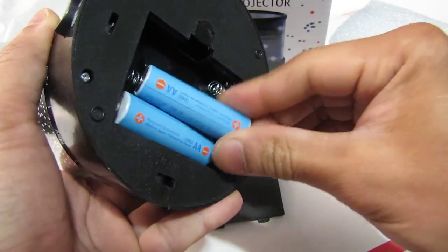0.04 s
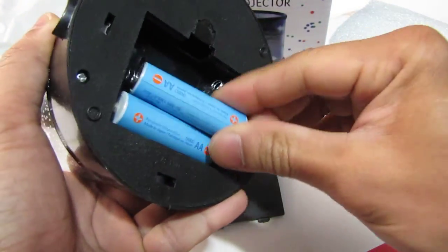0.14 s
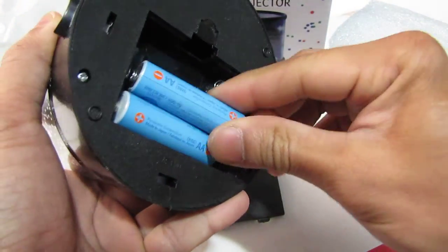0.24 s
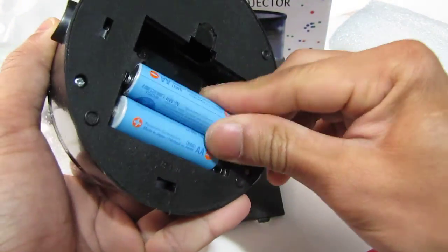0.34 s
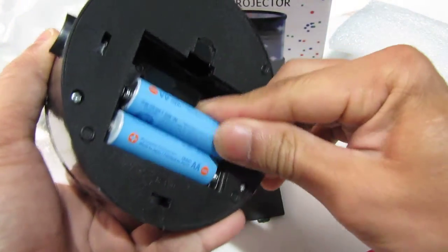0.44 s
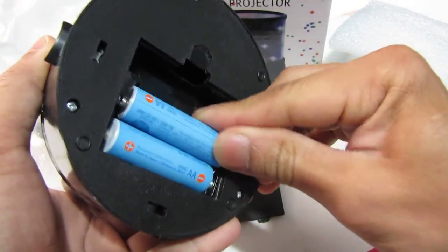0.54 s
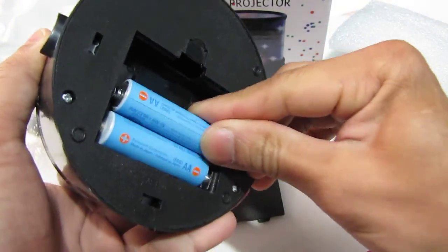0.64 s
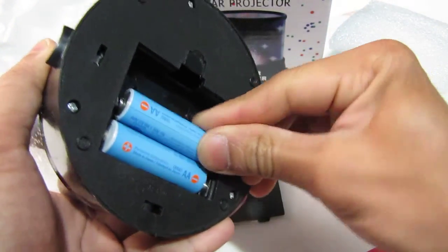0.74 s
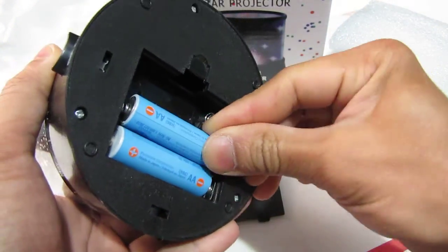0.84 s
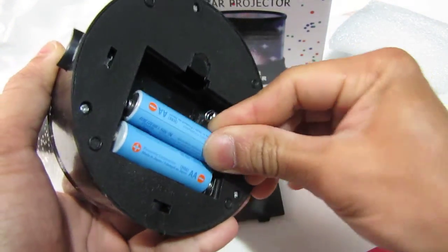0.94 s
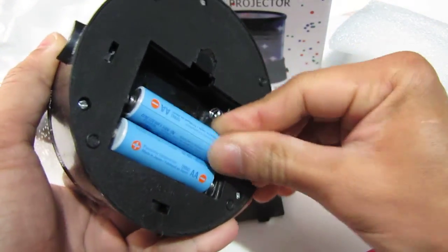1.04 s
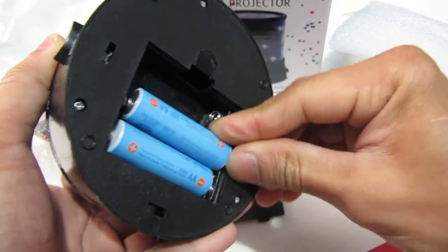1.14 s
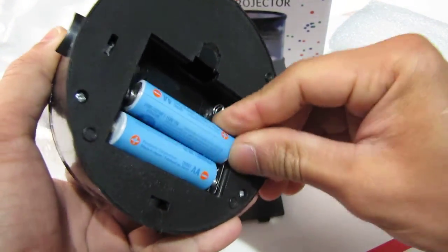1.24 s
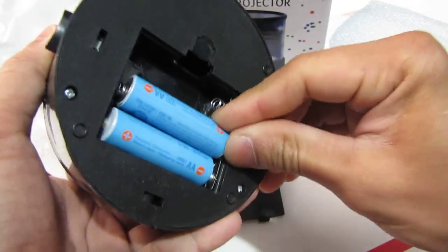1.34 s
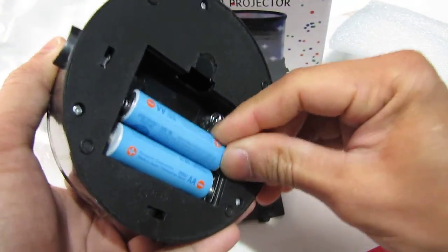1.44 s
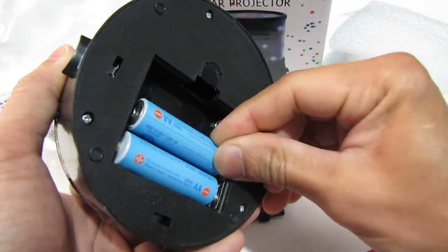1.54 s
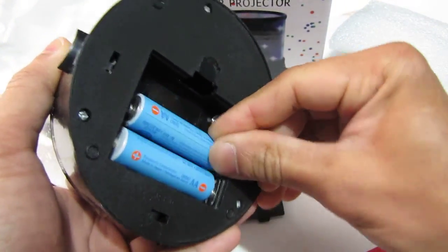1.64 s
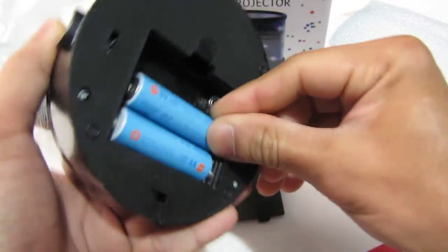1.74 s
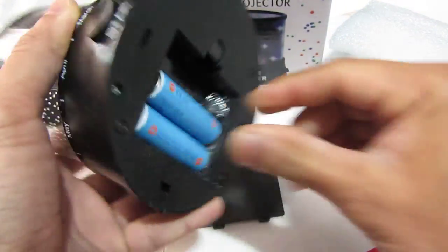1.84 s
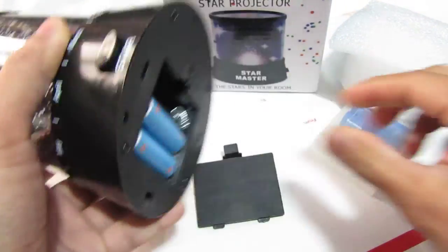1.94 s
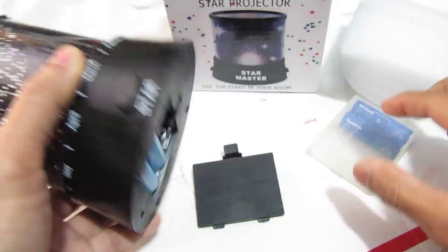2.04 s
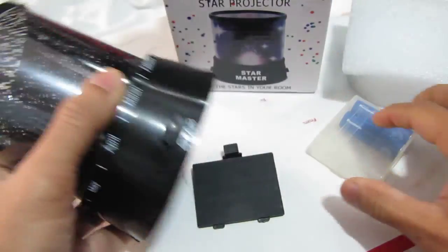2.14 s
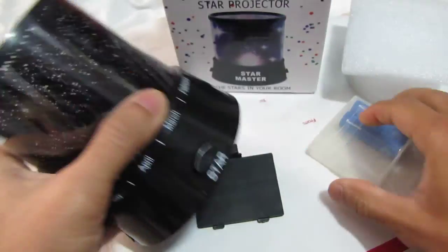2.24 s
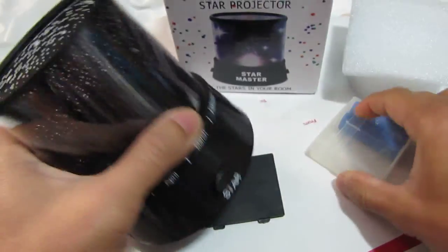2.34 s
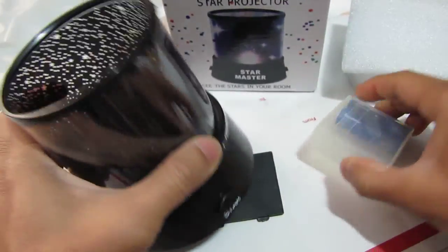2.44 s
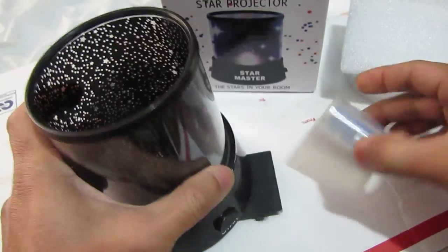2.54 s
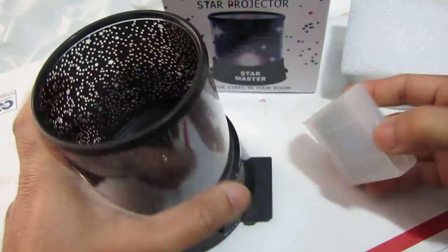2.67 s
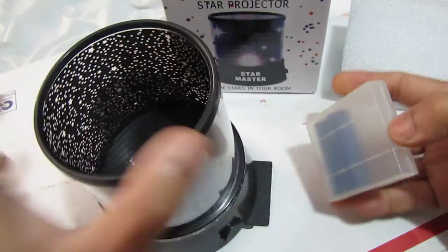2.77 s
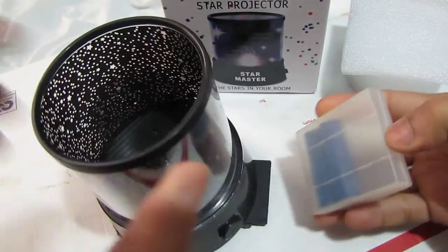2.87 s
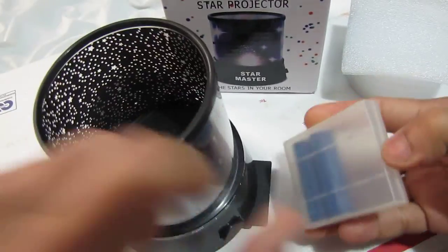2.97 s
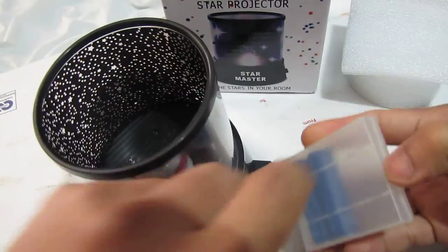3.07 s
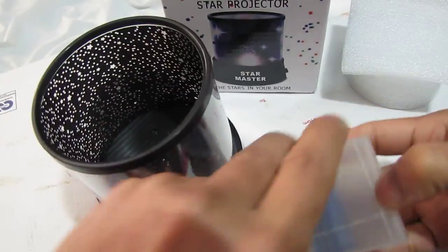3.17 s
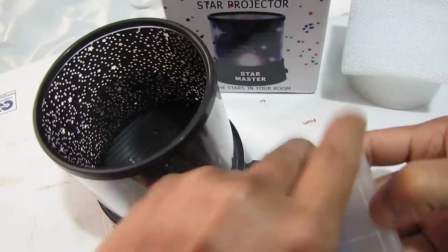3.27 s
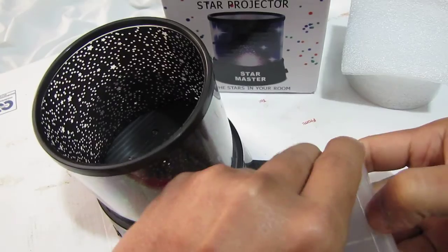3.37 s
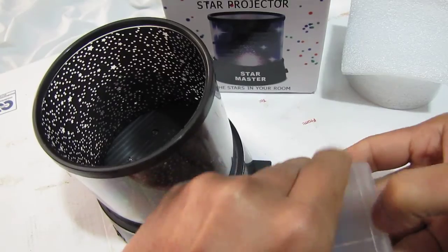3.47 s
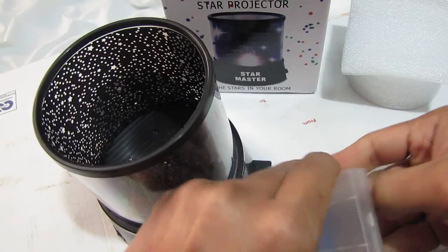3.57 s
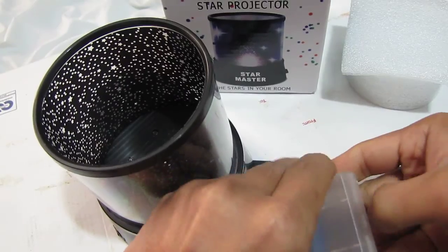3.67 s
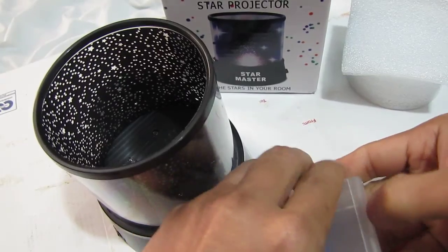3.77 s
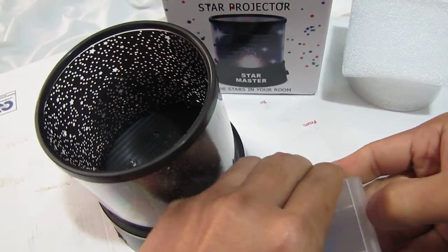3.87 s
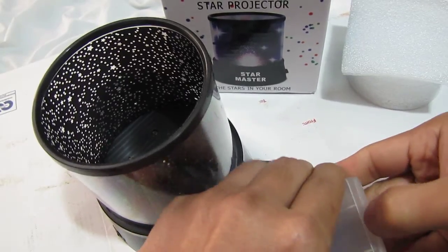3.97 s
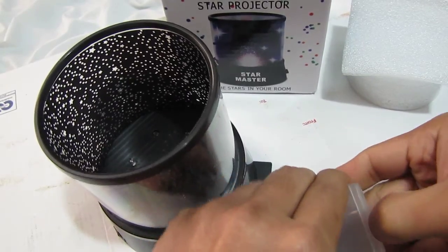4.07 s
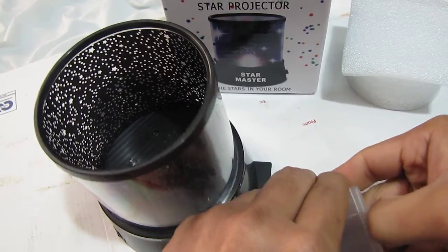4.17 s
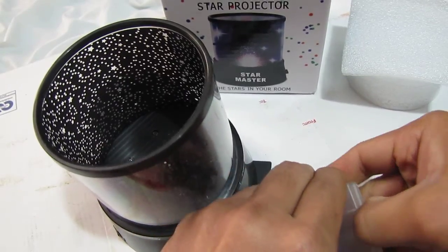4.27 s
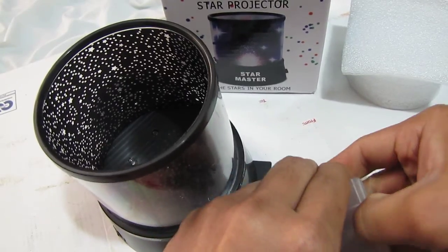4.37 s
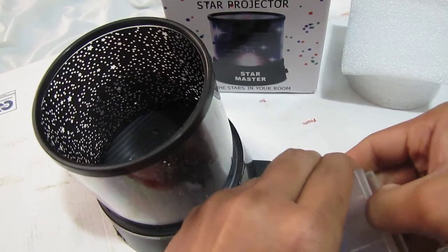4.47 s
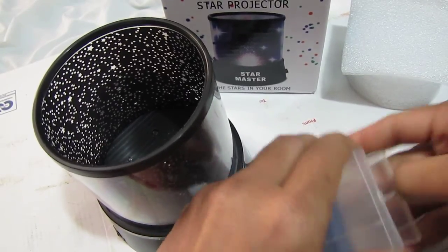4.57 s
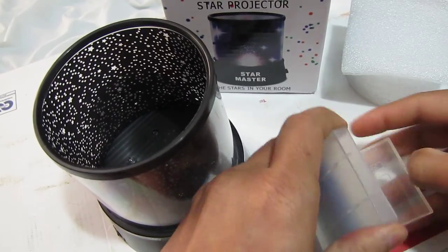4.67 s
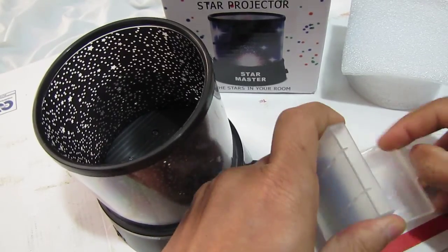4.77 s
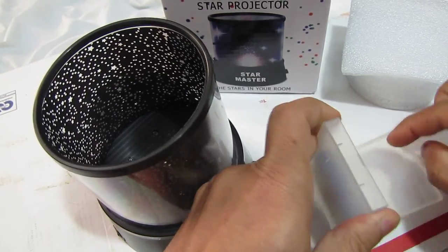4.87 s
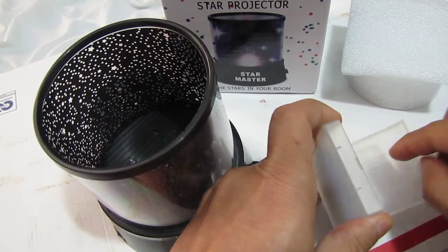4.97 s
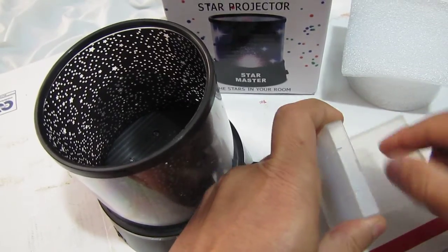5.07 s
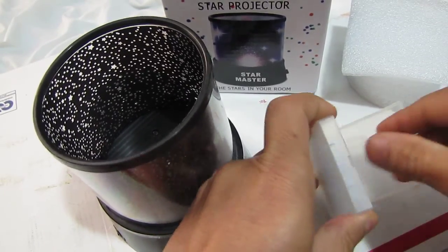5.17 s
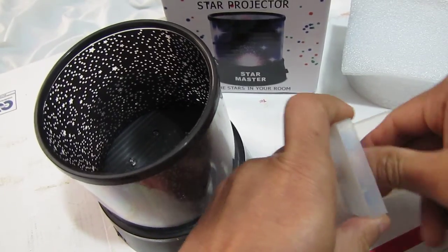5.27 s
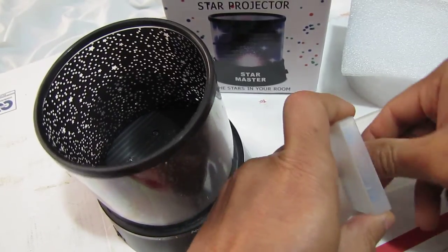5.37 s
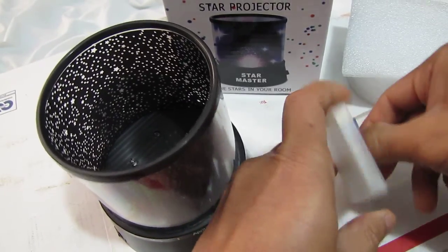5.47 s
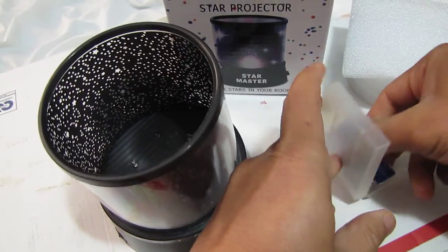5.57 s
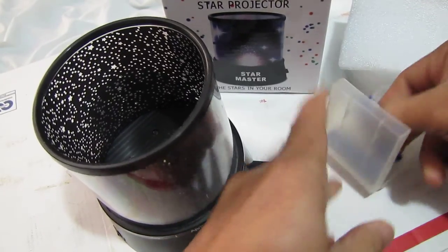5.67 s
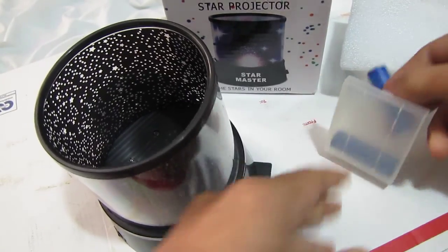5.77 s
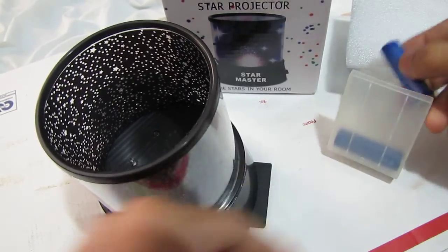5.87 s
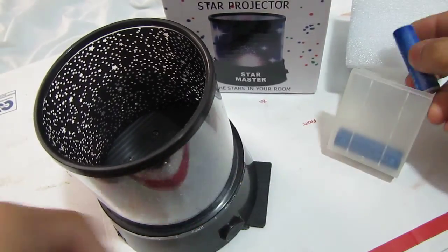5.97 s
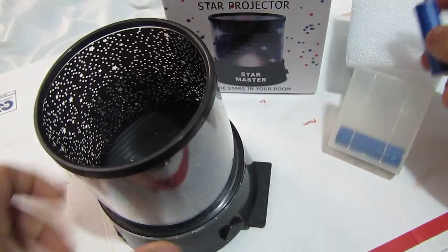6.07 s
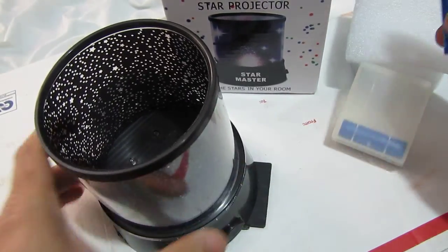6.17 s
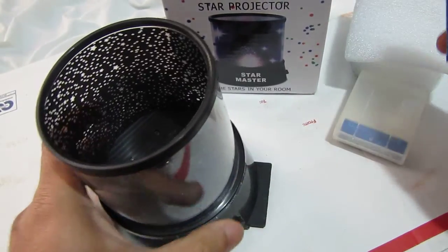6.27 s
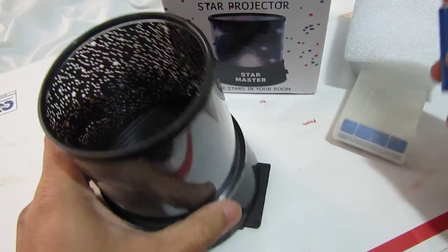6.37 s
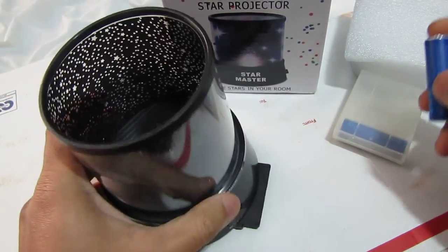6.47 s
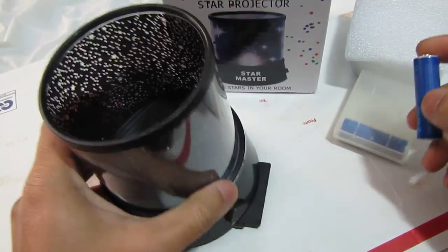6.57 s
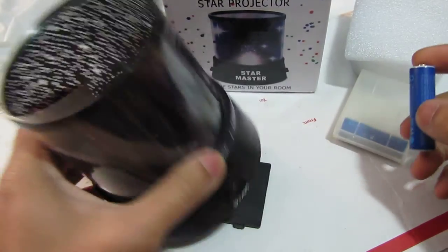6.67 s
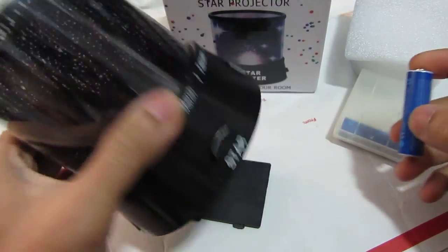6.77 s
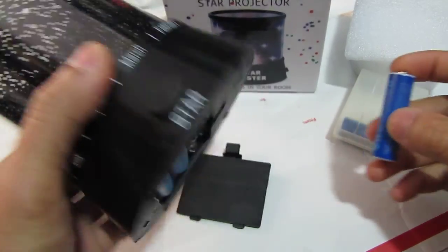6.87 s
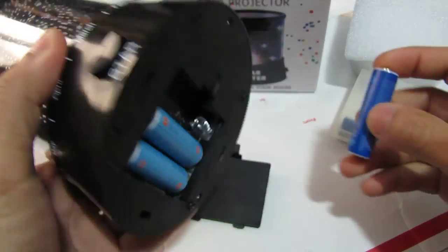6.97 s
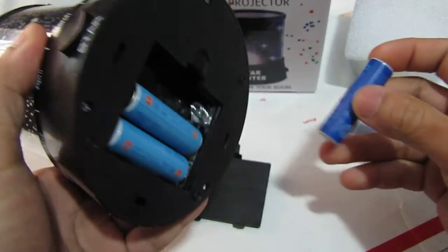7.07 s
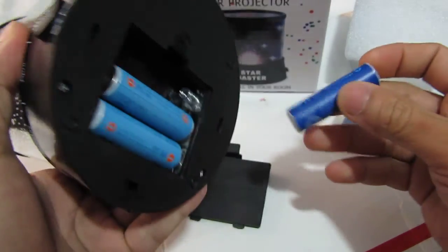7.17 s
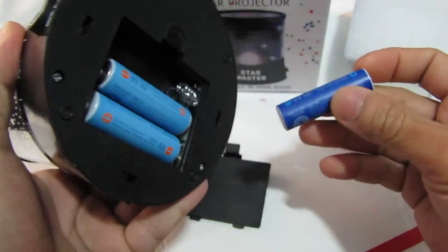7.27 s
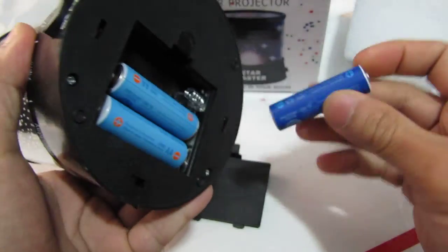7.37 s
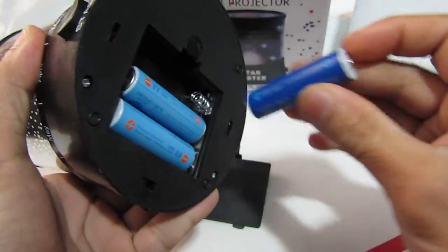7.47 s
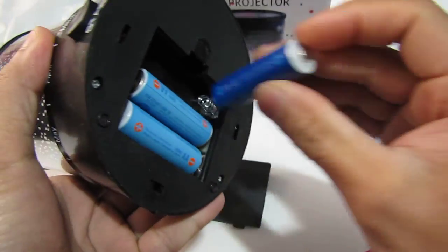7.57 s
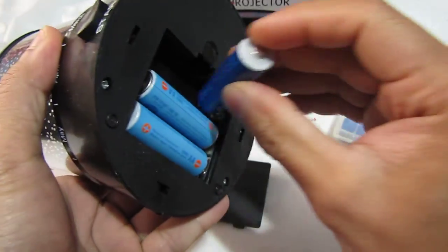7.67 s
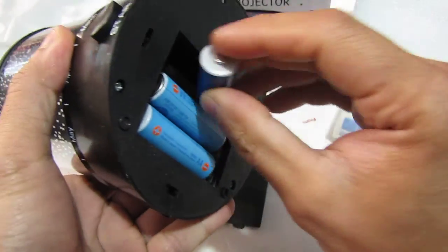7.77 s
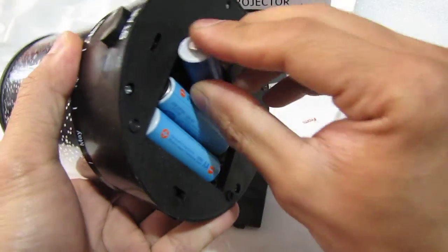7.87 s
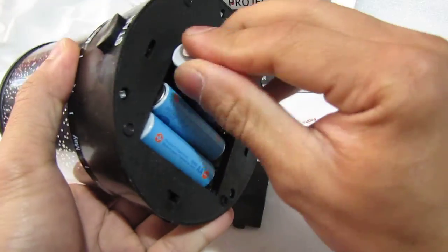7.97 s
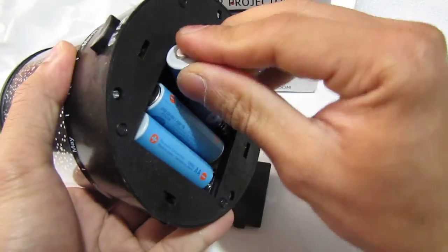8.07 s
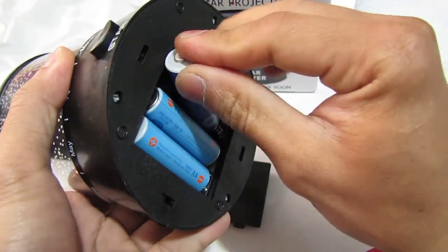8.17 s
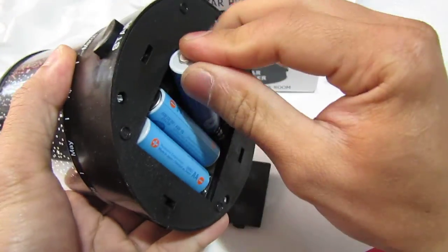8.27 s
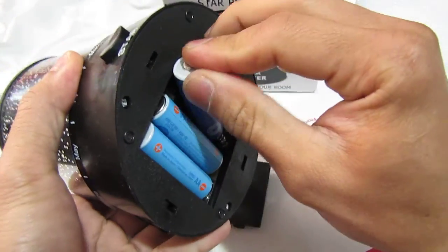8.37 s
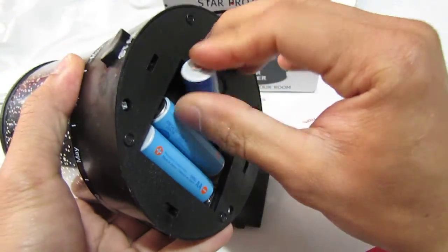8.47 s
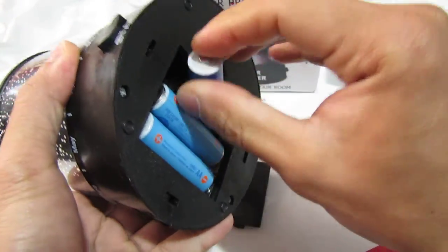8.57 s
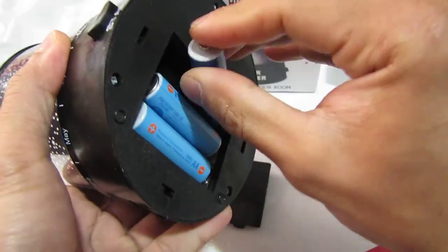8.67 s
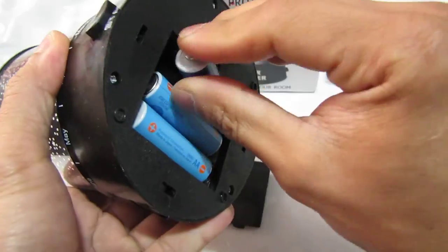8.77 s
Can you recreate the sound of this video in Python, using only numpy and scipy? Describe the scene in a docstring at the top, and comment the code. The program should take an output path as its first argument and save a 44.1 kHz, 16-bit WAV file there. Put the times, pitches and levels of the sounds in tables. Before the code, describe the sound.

Close stereo microphones in a small, quiet room with faint steady hiss. At 0 s a soft plastic click and short finger rub, a sharp snap at 0.13, then lighter clicks with a thin spring ping near 0.6. A ping and click follow at 1.0, and a hard snap with a tiny scrape at 1.5. From 2.0 to 2.8 the lamp scrapes, rumbles and knocks on the table, hardest at 2.55. A plastic click comes at 3.5; the case latch snaps and judders at 4.4. Hard table knocks at 4.8-4.9 lead into lid scrapes, ticks and rubbing, with a fuller thump at 5.55. Clicks, knocks and drags run from 5.85 to 6.65 as the lamp is lifted. After a near pause, battery clicks and a bright ping cluster at 7.6-7.85, hollow scrapes follow at 8.1-8.65, and a ringing spring ping ends it near 8.8.

```python
"""A click and a short rub on plastic, then knocks and pings: batteries are pressed into the bay of a small lamp.
The lamp is set on a table, a plastic battery case is snapped open and put down, the lamp is lifted again
and a third battery scrapes into its slot. Each contact is an impulse or a run of slips filtered by resonances;
the contact springs and the lamp's drum are decaying modes; rubbing fingers are stick-slip noise under
envelopes. All is close to two microphones in a small quiet room."""
import sys
import numpy as np
from scipy import signal
from scipy.fft import rfft, irfft
from scipy.io import wavfile
from scipy.ndimage import uniform_filter1d, map_coordinates

SR = 44100
rng = np.random.default_rng(int(sys.argv[2]) if len(sys.argv) > 2 else 0)


def wav_record(signal):
    """Record a signal, one row per channel, as 16-bit PCM in the file named by sys.argv[1]."""
    frames = np.transpose(np.atleast_2d(signal))
    bounded = np.clip(frames, -1, 1)
    # unit amplitude maps onto the largest positive 16-bit level
    quanta = np.round(bounded * 32767).astype(np.int16)
    wavfile.write(sys.argv[1], SR, quanta)


N = 389204
HZ = np.fft.rfftfreq(4096, 1 / SR) + 1  # frequency grid of the filters, kept above zero
# every movement gathers speed, holds, and dies away: attack and release time constant
RUB_ATTACK_S, RUB_RELEASE_S = 0.033, 0.019

# resonances of the hollow plastic shells: (frequency [Hz], width [Hz], relative gain [dB])
SHELL = [(489, 290, -12), (774, 375, -1), (973, 314, -22.5), (1294, 350, -1)]
# resonances of the case's lid: (frequency [Hz], width [Hz], relative gain [dB])
LID = [(851, 480, 1), (2060, 540, 7.5), (2560, 270, 4), (3450, 380, 0.5), (5250, 540, -1.5),
       (7540, 300, -9.5)]
# finger strokes over plastic: (start [s], end [s], relative rubbing level [dB], relative skin hiss level [dB])
RUBS = [(0.0, 0.017, -27.5, -52), (0.082, 0.134, -41.5, -60), (0.177, 0.208, -50, -54.5),
        (0.232, 0.334, -50, -55), (0.522, 0.771, -53.5, -63), (1.024, 1.15, -52.5, -59.5),
        (1.438, 1.504, -46, -61), (1.729, 1.767, -50, -48), (2.04, 2.091, -47.5, -47),
        (2.152, 2.404, -50.5, -60.5), (2.266, 2.31, -48, -49), (2.413, 2.485, -79, -45.5),
        (2.512, 2.688, -42.5, -47.5), (2.729, 2.744, -32, -52.5), (3.4, 3.51, -56, -54),
        (3.474, 3.533, -40, -44.5), (3.578, 3.77, -50, -58.5), (3.812, 3.955, -50.5, -56),
        (4, 4.061, -48.5, -56.5), (4.648, 4.79, -70, -52.5), (4.714, 4.942, -55, -46),
        (4.958, 5.35, -54.5, -55), (5.071, 5.26, -52, -47), (5.422, 5.564, -75, -43.5),
        (5.625, 5.82, -70, -45.5), (5.674, 5.735, -62, -36.5), (5.804, 5.88, -38, -49.5),
        (6.034, 6.045, -37.5, -40.5), (6.124, 6.237, -42, -48), (6.25, 6.431, -41.5, -53),
        (6.471, 6.684, -45, -55.5), (7.63, 7.814, -51.5, -51), (7.98, 8.28, -57, -60.5),
        (8.423, 8.659, -40, -51.5), (8.778, 8.83, -49, -50)]


def amp(db):
    """Decibel law: level to amplitude ratio."""
    return 10 ** (np.asarray(db) / 20)


def evened(x):
    """Normalisation by mean power: scales to rms 1."""
    return x / np.sqrt(np.mean(x ** 2) + 1e-20)


def read(points, hz):
    """Interpolation along a logarithmic frequency axis."""
    f, value = np.transpose(points)
    return np.interp(np.log(hz + 1), np.log(f + 1), value)


def add(mix, s, sound):
    """Superposition: mixes a sound in at time s."""
    part = mix[max(round(s * SR), 0):][:len(sound)]
    part += sound[:len(part)]


def causal(gain):
    """Minimum phase: folding the cepstrum gives a causal impulse response for a gain curve on HZ."""
    cepstrum = irfft(np.log(np.maximum(gain, 1e-5)))
    half = len(cepstrum) // 2
    cepstrum[1:half] *= 2
    cepstrum[half + 1:] = 0
    return irfft(np.exp(rfft(cepstrum)))


def coloured(x, spectrum):
    """Linear filtering: imposes a spectrum on x, at rms 1."""
    response = causal(amp(read(spectrum, HZ)))
    return evened(signal.oaconvolve(x, response)[:len(x)])


def peak(hz, width):
    """Damped resonance: gain with steep skirts, 1 at its centre."""
    return 1 / (1 + ((HZ ** 2 - hz ** 2) / (HZ * width)) ** 2)


def slips(count, per_s, spread_db):
    """Stick-slip: tiny impulses at random moments, a few much larger than the rest."""
    chance, size, sign = rng.random((count, 3)).T
    size_db = spread_db * np.minimum(-np.log(1 - size), 4)
    return (chance < per_s / SR) * np.sign(sign - .5) * amp(size_db)


def movements(starts, ends, levels_db, attack_s, release_s):
    """Power addition: envelopes with attack, hold and exponential release, summed as power where they overlap."""
    t, power = np.arange(0, N, 32) / SR, 0
    for start, end, db in zip(starts, ends, levels_db):
        attack = np.clip((t - start) / attack_s, 0, 1)
        release = np.exp(-np.maximum(t - end, 0) / release_s)
        power = power + (amp(db) * attack * release) ** 2
    return np.interp(np.arange(N) / SR, t, np.sqrt(power))


def contact(body, ring_db, ring_hz, body_db, edge_db, damping=1.0, edge_hz=6500, edge_width=8000, push_db=-30):
    """Resonance in parallel: the struck wall rings briefly, the body booms, the hard edge adds treble."""
    power = (amp(ring_db) * peak(ring_hz, damping * ring_hz)) ** 2
    power += sum((amp(body_db + db) * peak(hz, width)) ** 2 for hz, width, db in body)
    power += (amp(edge_db) * peak(edge_hz, edge_width)) ** 2
    power += (amp(body_db + push_db) * peak(360, 760)) ** 2  # the whole object is pushed
    absorption = 1 + (HZ / 12500) ** 6  # the top treble falls away steeply
    return causal(np.sqrt(power / absorption))


def chatter(hardness, share_db, t60, snap_s=0.00033, seat_s=0.0015):
    """Contact time: a hard snap nears one impulse, a gentle one seats over milliseconds; a rattle follows."""
    t = np.arange(2048) / SR
    seating, rattle = rng.standard_normal((2, len(t)))
    u = t / (seat_s + hardness * (snap_s - seat_s))
    seating *= u * np.exp(-u)
    seating *= (1 - .6 * hardness) / np.linalg.norm(seating)
    rattle *= amp(-60 * t / t60) * (t > .002)
    rattle /= np.linalg.norm(rattle)
    dull = signal.lfilter(*signal.butter(1, 2500, fs=SR), rattle)
    rattle = 3.2 * dull + (rattle - dull) * np.exp(-t / 0.0038)  # its treble dies first
    blow = seating + amp(share_db - 10.7 * hardness) * rattle
    blow[0] = 0.5 + 0.12 * hardness  # the impulse of first touch
    return blow / np.linalg.norm(blow)


def hits(rows, body, rattle_db, rattle_t60, gentle_db, held_damping=0.7, free_damping=0.67):
    """Impact excitation: the louder the ring, the harder the contact and the more freely the wall rings."""
    out = np.zeros(N)
    for s, ring_db, *colour in rows:
        hardness = np.clip((ring_db - gentle_db) / 20, 0, 1)
        damping = held_damping + hardness * (free_damping - held_damping)
        response = contact(body, ring_db, *colour, damping)
        add(out, s, signal.fftconvolve(response, chatter(hardness, rattle_db, rattle_t60)))
    return out


def slides(rows, body, per_s, spread_db, grip):
    """Friction excitation: runs of slips into a body, swelling from a share of the pressure (grip) to all of it."""
    out = np.zeros(N)
    for start, end, *colour in rows:
        count = int(np.clip((end - start) * SR, 200, 4096))
        run = slips(4096, per_s, spread_db)[:count]
        run = run * signal.windows.tukey(count, .5) * np.linspace(grip, 1, count)
        run = run / (np.linalg.norm(run) + 1e-9)
        add(out, start, signal.fftconvolve(contact(body, *colour), run))
    return out


def floor(own_share=1.0):
    """Partial coherence: steady room noise and microphone hiss, part shared by both channels."""
    # steady noise: (frequency [Hz], relative density [dB per Hz])
    floor_spectrum = [(25, -17.5), (60, -10.5), (140, -11.5), (235, -5.5), (400, -12.5), (700, -10.5),
                      (1130, -6.5), (1380, -6), (1560, -14), (3200, -15.5), (5000, -18.5), (8500, -22.5),
                      (16000, -32.5)]
    shared, left, right = (coloured(rng.standard_normal(N), floor_spectrum) for _ in range(3))
    return amp(-56.5) * evened(shared + own_share * np.array([left, right]))


def room(x, own_share=0.98):
    """Diffuse reverberation: a short decaying noise tail, partly shared by the two microphones."""
    # decay of the room: (frequency [Hz], t60 [s])
    room_decay = [(150, 0.1), (500, 0.1), (1400, 0.062), (3700, 0.066), (10000, 0.042)]
    noise = rng.standard_normal((3, SR // 3))
    hz, t, z = signal.stft(noise, SR, nperseg=256)
    apart = own_share * np.minimum(hz / 1500, 1)[:, None]  # long waves reach both alike
    decay = amp(-60 * t / read(room_decay, hz)[:, None])
    onset = np.clip(t / 0.007 - 1, 0, 1)  # silent for 7 ms, full at 14 ms
    z = (z[0] + apart * z[1:]) * decay * onset
    tail = signal.istft(z, SR, nperseg=256)[1]
    return signal.fftconvolve(x[None], tail / np.linalg.norm(tail[0]), axes=1)[:, :N]


def thuds(t60=0.093):
    """Damped vibration: a soft hand bumps an object and excites a few low modes."""
    # soft bumps of the hand: (time [s], relative level [dB], frequency [Hz])
    bumps = [(2.003, -34, 106), (2.071, -24, 243), (3.63, -37, 143), (5.019, -31.5, 204), (6.137, -37, 115)]
    out, t = np.zeros(N), np.arange(SR // 4) / SR
    for s, level_db, hz in bumps:
        swing = sum(np.sin(2 * np.pi * hz * ratio * t) for ratio in (.77, 1.03, 1.4))
        add(out, s, amp(level_db - 60 * t / t60) * swing * np.minimum(t / .01, 1))
    return out


def case_in_hand():
    """Smoothed switching: 1 while the hands hold the case, 0 while they hold the lamp."""
    # while the case is handled, to the right: (start [s], end [s])
    case_span = (3.1, 6.1)
    n = np.arange(N)
    held = (n > case_span[0] * SR) & (n < case_span[1] * SR)
    return uniform_filter1d(1. * held, size=4000)


def thin_walled(x):
    """Forced resonance: rubbing on the case sets its thin lid singing."""
    walls = causal(1 + sum(peak(hz, width) for hz, width, _ in LID[1:]))
    sung = evened(signal.oaconvolve(x, walls)[:N])
    return x + case_in_hand() * (sung - x)


def patchy(x, patch_db, clump_db):
    """Random modulation: the contact spot wanders, so resonances come and go and friction bunches into bursts."""
    z = signal.stft(x, nperseg=512, noverlap=384)[2]
    patches = uniform_filter1d(rng.standard_normal(z.shape), size=4, axis=0)
    patches = uniform_filter1d(patches, size=10, axis=1)
    clumps = uniform_filter1d(rng.standard_normal(z.shape[1]), size=7)
    z = z * amp(patch_db * evened(patches) + clump_db * np.tanh(evened(clumps)))
    return evened(signal.istft(z, nperseg=512, noverlap=384)[1][:N])


def hands():
    """Stick-slip friction: each finger stroke is a grainy rub with a finer hiss; shifting objects rumble."""
    # spectra of rub, hiss and rumble: (frequency [Hz], relative density [dB per Hz])
    rub_spectrum = [(120, -37), (250, -37.5), (500, -5.5), (800, 7), (1250, 1.5), (1800, -1), (2500, -6),
                    (3400, -7.5), (5000, -27)]
    hiss_spectrum = [(100, -24), (500, -9), (2000, -3), (3500, -2), (5500, -3.5), (6900, -6.5), (8300, -13),
                     (11000, -19), (16000, -30)]
    rumble_spectrum = [(30, -14.5), (60, -19), (120, 0), (220, 2.5), (380, 0.5), (550, -2), (1000, -35.5)]
    # lamp or case shifting in the grip or on the table: (start [s], end [s], relative rumble level [dB])
    shifts = [(2.015, 2.143, -53), (2.166, 2.412, -53), (2.46, 2.597, -49.5), (2.664, 2.775, -50),
              (3.617, 4.224, -61.5), (3.876, 3.957, -60.5), (4.039, 4.093, -55.5), (4.739, 4.866, -56),
              (5.054, 5.365, -55.5), (5.431, 5.566, -52), (5.635, 5.717, -49), (5.826, 5.854, -40.5),
              (6.175, 6.433, -47), (6.481, 6.525, -44), (6.604, 6.654, -43.5)]
    start, end, rub_db, hiss_db = np.transpose(RUBS)
    friction = evened(slips(N, per_s=1100, spread_db=3.8)) + .5 * rng.standard_normal(N)
    skin = patchy(friction, patch_db=4, clump_db=3)
    bumps = patchy(slips(N, per_s=500, spread_db=3), patch_db=2.5, clump_db=3)
    rub = movements(start, end, rub_db, RUB_ATTACK_S, RUB_RELEASE_S) * coloured(skin, rub_spectrum)
    hiss = movements(start, end, hiss_db, RUB_ATTACK_S, RUB_RELEASE_S)
    hiss = hiss * thin_walled(coloured(skin, hiss_spectrum))
    rumble = movements(*np.transpose(shifts), attack_s=0.008, release_s=0.038)
    rumble = rumble * coloured(bumps, rumble_spectrum)
    return amp(-2.6) * rub + amp(4.0) * hiss + amp(5.5) * rumble


def catches(count=170):
    """Random micro-impacts: nails and plastic edges catch in tiny ticks, each at its own pitch."""
    out = np.zeros(N)
    rubbing = movements(*np.transpose(RUBS)[:3], RUB_ATTACK_S, RUB_RELEASE_S)
    for when, size, pitch, hollow, edge in rng.random((count, 5)):
        rub_db = 20 * np.log10(rubbing[int(when * N)] + 1e-6)
        db = min(rub_db, -48) + 35 + 7 * size ** 2  # ticks follow the rubbing up to a ceiling
        tick = contact(SHELL, db, 1300 * 3 ** pitch, db + 8 * hollow, db - 24 + 12 * edge)
        add(out, when * N / SR, signal.fftconvolve(tick, chatter(0, -10, .01)))
    return out


def table_contacts():
    """Coupled resonance: knocks and drags of lamp or case excite the table with its load."""
    # resonances of the loaded table: (frequency [Hz], width [Hz], relative gain [dB])
    table_modes = [(141, 85, -6.5), (234, 68, 1.5), (311, 120, 2.5), (403, 120, 3.5), (535, 56, -1),
                   (814, 530, -0.5), (1180, 240, -5.5)]
    # lamp and case knocking on the table; ring, table and edge levels are relative:
    # (time [s], ring [dB], ring frequency [Hz], table [dB], sharp edge [dB])
    knocks = [(2.0789, -8, 2960, 4.5, -23), (2.4678, 9.5, 1290, 14, -30), (2.5287, 7.5, 3570, 18, -6),
              (2.5556, 28, 3780, 25, 19.5), (2.575, 18, 3720, 19.5, 8), (2.583, 14, 2570, 17, -7),
              (2.6706, 4, 1070, 12.5, -6.5), (2.7319, 10.5, 2480, 14, -8), (2.777, -12, 1120, 7.5, -32),
              (4.797, 5.5, 1060, 18.5, -4.5), (4.809, 11, 1000, 7, -21), (4.8593, 28.5, 1070, 28, 25),
              (4.8645, 8, 1320, 21.5, -5), (4.9659, -6, 2190, 5.5, -22), (5.237, -10, 900, -1, -25),
              (5.2784, 3, 2470, 9, -8), (5.3482, 12, 2170, 16, -12), (5.5528, 22, 1510, 29, 2.5),
              (5.7149, 9, 2490, 18.5, -22), (6.205, 21.5, 1420, 24.5, -13), (6.2742, 8, 1210, 11, -0.5),
              (6.5894, 19, 2540, 28.5, 5.5), (6.5998, 16.5, 2270, 18, -20), (6.622, 10, 2340, 20.5, -13)]
    # lamp or case dragged on the table; levels are relative:
    # (start [s], end [s], ring [dB], ring frequency [Hz], table [dB], sharp edge [dB])
    drags = [(2.48, 2.522, 3.5, 2290, 8.5, -32), (4.847, 4.856, 15.5, 1200, 14.5, -6),
             (6.285, 6.33, 13.5, 1100, 12.5, -11), (6.347, 6.41, 16, 1300, 20, -7)]
    knocking = amp(-5.5) * hits(knocks, table_modes, rattle_db=-3.5, rattle_t60=0.026, gentle_db=-2.5)
    dragging = amp(-1.0) * slides(drags, table_modes, per_s=1400, spread_db=6, grip=0.45)
    return knocking + dragging


def case_contacts():
    """Plate resonance: latch, lid and batteries snap, tick and scrape against the thin lid."""
    # the latch springs open, then lid and batteries tick against the case; levels are relative:
    # (time [s], ring [dB], ring frequency [Hz], lid [dB], sharp edge [dB])
    case_clicks = [(4.3835, 27, 2180, 24.5, 7.5), (4.472, -5, 4500, -13, -18), (4.513, -4, 3000, -10, -23),
                   (4.759, 21.5, 3480, 5, -2), (5.249, 7, 1830, 9, -8), (5.4626, 2, 1900, -1.5, -6.5),
                   (5.6497, -14, 3270, -9, -6.5), (5.8968, 2.5, 1670, -2.5, -8)]
    # the lid judders, and batteries scrape along the walls; levels are relative:
    # (start [s], end [s], ring [dB], ring frequency [Hz], lid [dB], sharp edge [dB])
    case_scrapes = [(4.39, 4.412, 19, 2580, 17, 7), (5.155, 5.23, 16.5, 4530, 14.5, -8),
                    (5.704, 5.742, 12, 2580, 7, 6), (5.745, 5.822, 17.5, 1600, -11, 6)]
    snapping = amp(-1.5) * hits(case_clicks, LID, rattle_db=-19.5, rattle_t60=0.033, gentle_db=0)
    scraping = amp(-12.5) * slides(case_scrapes, LID, per_s=5500, spread_db=0.5, grip=1)
    return snapping + scraping


def springs(reach_octaves=1.0):
    """Modal vibration: a coil slips off the battery's end and rings; no two plucks share out its modes alike."""
    # plucked contact springs: (time [s], which spring, relative level [dB], most excited frequency [Hz])
    pings = [(0.411, "slack", -36.5, 2700), (0.6058, "slack", -18, 4370), (.621, "slack", -24.5, 6530),
             (0.689, "slack", -33, 2700), (1.0047, "stiff", -28, 4120), (7.755, "slack", -18, 6000),
             (8.7888, "stiff", -19.5, 4520), (8.794, "stiff", -19, 6430), (8.807, "stiff", -18.5, 3370)]
    # wire modes of each spring: (frequency [Hz], relative level [dB], t60 [s])
    spring_modes = {"slack": [(2250, 5.5, 0.085), (2427, 8, 0.061), (3710, 8, 0.048), (4655, -3, 0.1),
                    (5110, 10, 0.054), (7300, -4.5, 0.024), (8250, -3, 0.03)], "stiff": [(2920, 4.5, 0.14),
                    (3375, 11, 0.094), (3530, 13.5, 0.047), (4200, -4, 0.054), (4716, 9, 0.035),
                    (5400, 1, 0.046), (7270, 8, 0.036), (9280, 2, 0.053), (11690, -7, 0.048)]}
    out, t = np.zeros(N), np.arange(SR // 5) / SR
    for s, spring, level_db, pluck_hz in pings:
        hz, db, t60 = np.transpose(spring_modes[spring])[:, :, None]
        distance = np.log2(hz / pluck_hz) / reach_octaves
        size = amp(db + rng.standard_normal(hz.shape)) / (1 + distance ** 2)
        modes = size * amp(-60 * t / t60) * np.sin(2 * np.pi * (hz * t + rng.random(hz.shape)))
        # the wire chatters on the cap
        buzz = 1 + .3 * evened(uniform_filter1d(rng.standard_normal(len(t)), size=50))
        add(out, s, amp(level_db) * buzz * modes.sum(0) / np.linalg.norm(size))
    return signal.lfilter(*signal.butter(2, 900, "high", fs=SR), out)


def drum(x):
    """Sympathetic resonance: lightly damped modes of the lamp's hollow drum ring on after each contact."""
    # drum modes: (frequency [Hz], gain at the peak [dB], t60 [s])
    drum_modes = [(214, -16.5, 0.067), (319, -13, 0.13), (922, -21.5, 0.088), (1148, -5.5, 0.12),
                  (1320, -4.5, 0.11), (1470, -5, 0.15), (2440, -7, 0.23)]
    t = np.arange(SR // 4) / SR
    hz, db, t60 = np.transpose(drum_modes)[:, :, None]
    decay = amp(-60 * t / t60)
    modes = 2 * amp(db) * decay / decay.sum(1, keepdims=True) * np.cos(2 * np.pi * hz * t)
    return signal.oaconvolve(x, modes.sum(0))[:N]


def battery_contacts():
    """Shell resonance: batteries and catches snap and slide against hollow plastic."""
    # batteries and catches snapping; ring, shell and edge levels are relative:
    # (time [s], ring [dB], ring frequency [Hz], hollow shell [dB], sharp edge [dB])
    clicks = [(0.0095, 4.5, 2560, 17, -24), (0.1314, 20, 2420, 13, -27), (0.1326, 28.5, 1180, 2, -31),
              (0.2701, 1.5, 2760, 6, -29), (0.3865, -1, 2270, 0, -6.5), (0.5511, 11.5, 1530, 14, -13),
              (0.6293, 11, 1090, 14, -25), (0.718, 6, 620, -12, -38), (1.0054, 17, 4000, -3, 7),
              (1.0269, -12, 3460, 8.5, -16), (1.179, -8, 2160, 0.5, -27), (1.4196, -5, 3280, 4.5, -4),
              (1.48, 9.5, 1700, 11, -8), (1.518, 29.5, 3000, 18.5, -1), (1.722, -1, 3380, 0, -51),
              (1.7834, -2, 3046, -8, 1), (2.214, -1, 1490, -3, -25), (2.2801, 2.5, 1410, 8.5, -34),
              (2.7105, -4, 2170, 8, -13), (3.5273, 29, 1213, -6.5, -3.5), (3.598, 1, 1400, -9, -9),
              (3.7027, 8, 2940, 2, -5.5), (3.739, 3.5, 1300, -6, -15), (4.1253, 0.5, 3200, 7.5, -13),
              (5.8306, -14, 2960, 19, -7), (5.858, 18.5, 2270, 22.5, 3), (6.0602, 6, 2010, 11, -0.5),
              (6.1698, 19, 1800, -10, -8), (6.1778, 11, 1990, 18, -7), (6.5122, 21, 2410, 26, -1.5),
              (6.926, 2, 2714, -4.5, -43), (7.6218, 3, 3090, 20.5, -11.5), (7.6336, 18, 1400, 22, -8),
              (7.704, 14, 3450, 7, -4), (7.7454, 15, 2550, 18.5, -16), (7.7558, 23, 4430, 11, 11),
              (7.8538, 25.5, 830, 4.5, -1), (8.32, -2, 1860, 4.5, -21), (8.368, -12.5, 2710, 8, -39),
              (8.6054, 12.5, 1450, -5, -34), (8.7897, 5, 1400, -13, 3)]
    # hard parts sliding over each other; levels are relative:
    # (start [s], end [s], ring [dB], ring frequency [Hz], hollow shell [dB], sharp edge [dB])
    scrapes = [(1.499, 1.519, 19, 2700, 5, 6), (1.5135, 1.518, 19.5, 5260, 5.5, 0),
               (1.997, 2.05, 16, 2470, 2, 8.5), (3.505, 3.526, 22, 1300, -5, 7),
               (3.522, 3.527, 19, 3680, 26, -8), (3.92, 3.932, 2, 1430, 10, -1.5),
               (6.13, 6.15, 17.5, 1800, 19, 1), (7.645, 7.657, -1.5, 3730, 25, -26.5),
               (7.698, 7.709, 10, 3600, 7, 10), (7.724, 7.743, 22, 3330, 22.5, 6),
               (7.819, 7.84, 6.5, 3160, 16, -22), (8.083, 8.1, 15.5, 1520, 16.5, -7.5),
               (8.165, 8.22, 18, 1960, 16.5, -8), (8.515, 8.605, 12.5, 1500, 29, -3),
               (8.637, 8.662, 25, 1240, -9, 0.5)]
    clicking = amp(-5.0) * hits(clicks, SHELL, rattle_db=-14, rattle_t60=0.034, gentle_db=10.5)
    scraping = amp(-12.5) * slides(scrapes, SHELL, per_s=3000, spread_db=0.5, grip=0.88)
    return clicking + scraping


def placed(x, lag_samples=1.53, lean_db=0.03, scatter_db=-8, case_scatter_db=3):
    """Time and level difference: the case, to the right, reaches the left microphone later and weaker."""
    n, side = np.arange(N), case_in_hand()
    # long waves arrive straight; short waves scatter off the hands differently towards each microphone
    straight = signal.filtfilt(*signal.butter(1, 8000, fs=SR), x)
    left = map_coordinates(straight, [n - lag_samples * side], order=3) + x - straight
    treble = signal.lfilter(*signal.butter(1, 2000, "high", fs=SR), x)
    taps = rng.standard_normal(96)
    taps[:20] = 0  # the detour takes half a millisecond
    scatter = signal.oaconvolve(treble, taps / np.linalg.norm(taps))[:N]
    scatter = amp(scatter_db + case_scatter_db * side) * scatter
    lean = amp(lean_db * side + 0.08)
    return np.array([left / lean + scatter, x * lean - scatter])


def scene():
    """Superposition of direct sound, reverberation and noise: contacts, springs and hands in a small room."""
    contacts = battery_contacts() + table_contacts() + catches()
    # the case is in the air, clear of the lamp, so it leaves the drum silent
    near = contacts + drum(contacts) + case_contacts() + springs() + hands() + thuds()
    return placed(near) + amp(-21.0) * room(near) + floor()


def record(dry, threshold_db=-4, recover_db_per_s=11, edge_hz=16100):
    """Gain reduction: the hardest snaps overload the input and turn the gain down briefly; then a band limit."""
    limited = np.clip(dry, -1, 1)
    over_db = np.maximum(20 * np.log10(abs(limited).max(0) + 1e-9) - threshold_db, 0)
    recovery = np.arange(N) / SR * recover_db_per_s
    held_db = np.maximum.accumulate(over_db + recovery) - recovery
    ducked = limited / amp(signal.lfilter([.002], [1, -.998], held_db))  # smoothed over about 11 ms
    low_pass = signal.firwin(511, edge_hz, window=("kaiser", 9), fs=SR)
    return signal.oaconvolve(ducked, low_pass[None], "same")


dry = scene()
out = record(dry)
wav_record(out)
```